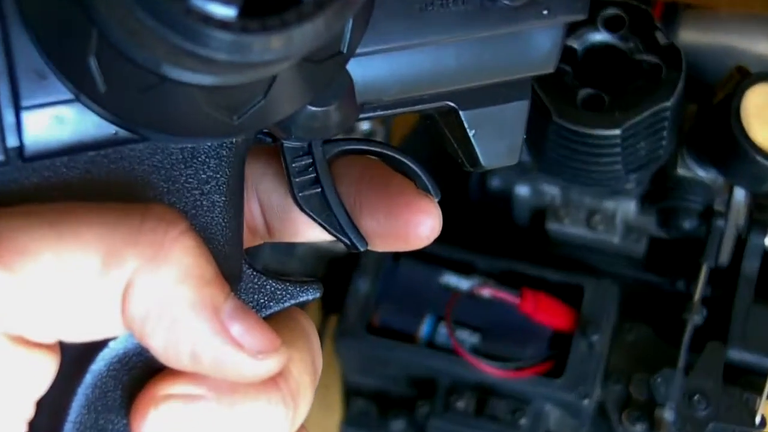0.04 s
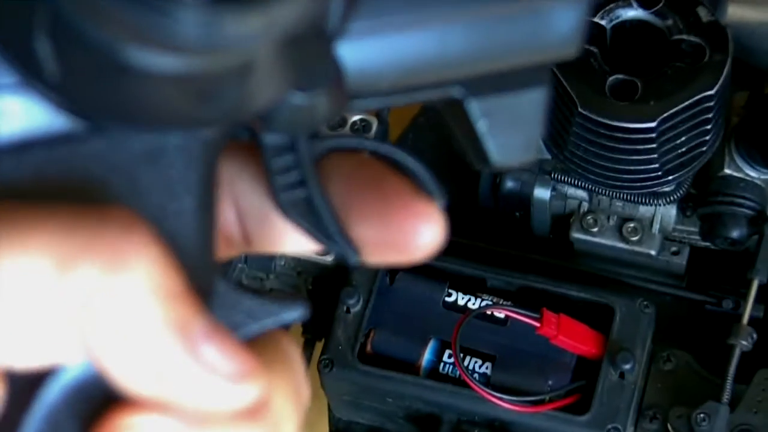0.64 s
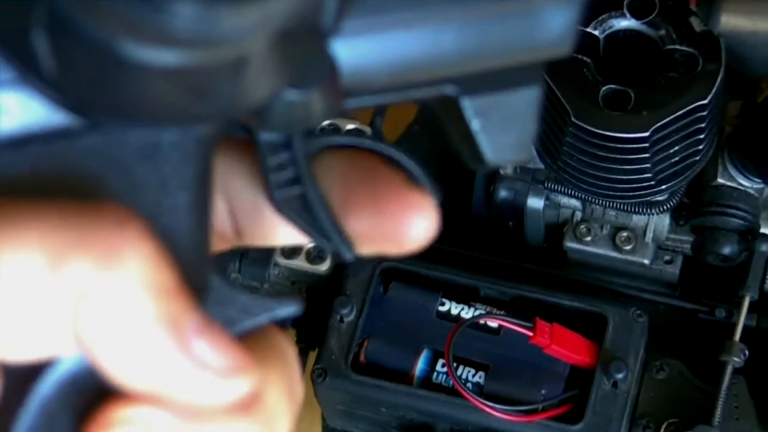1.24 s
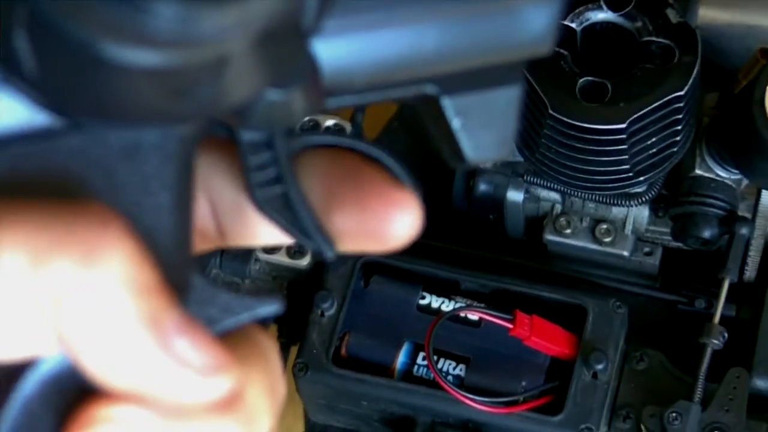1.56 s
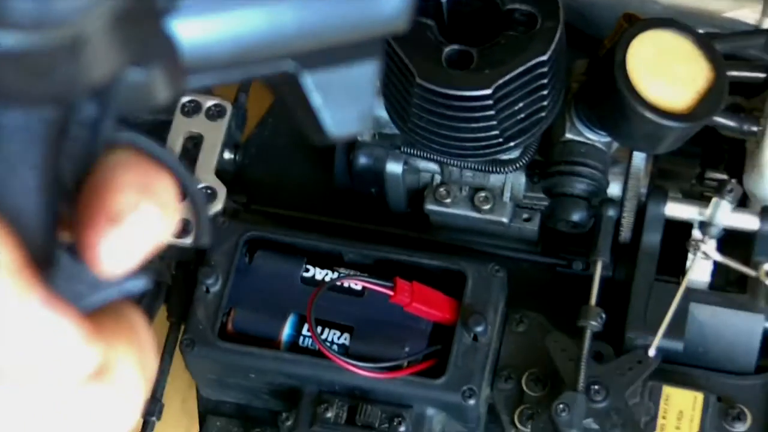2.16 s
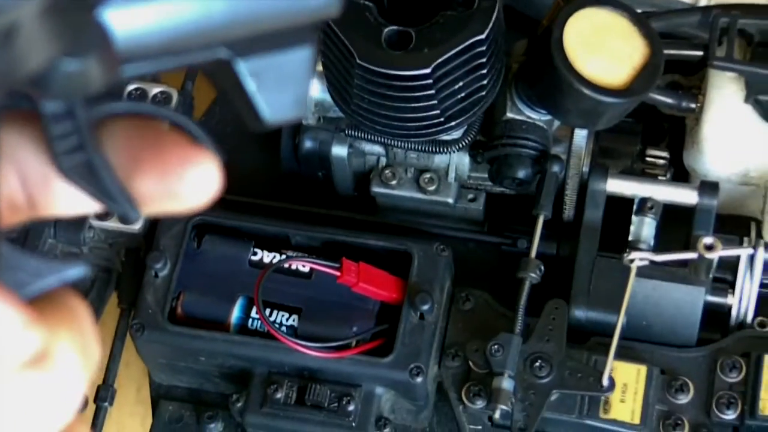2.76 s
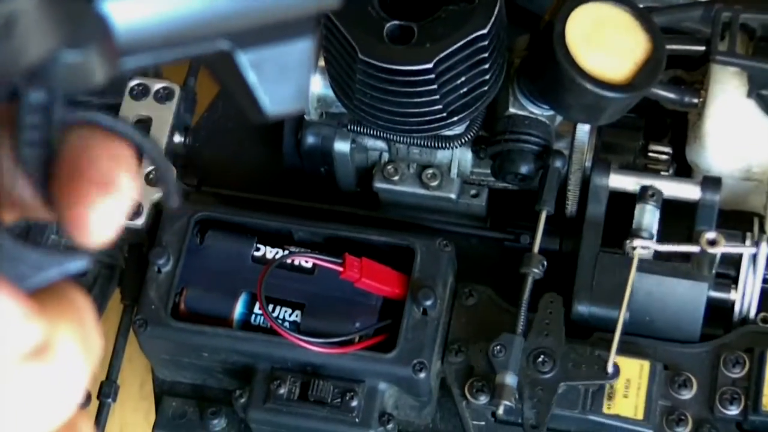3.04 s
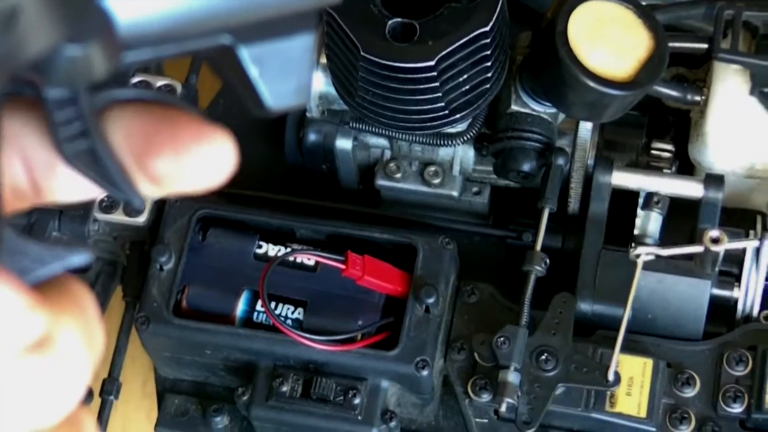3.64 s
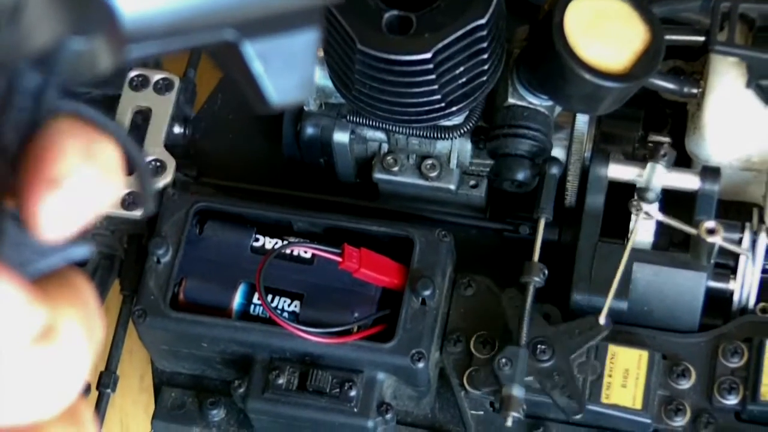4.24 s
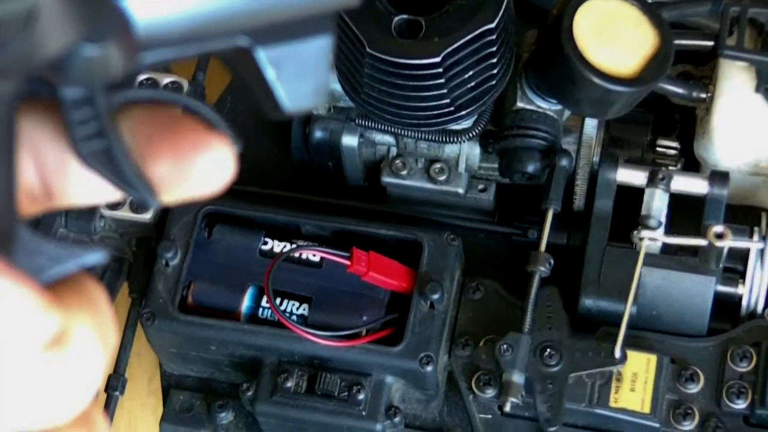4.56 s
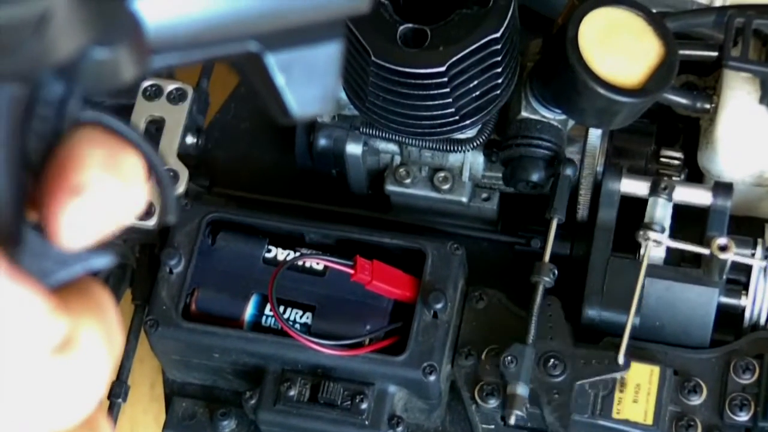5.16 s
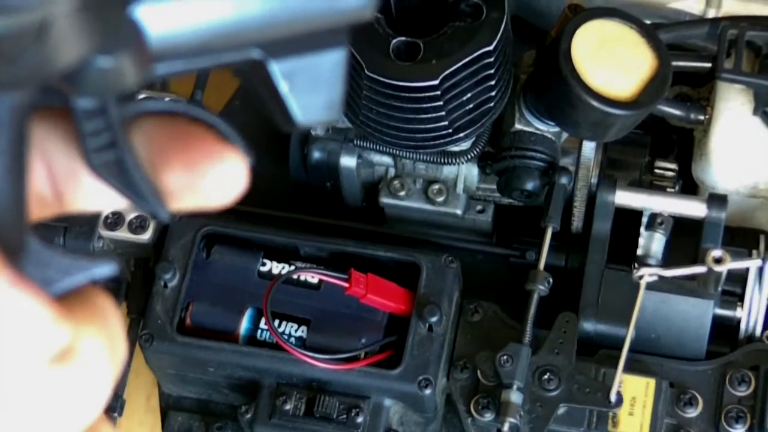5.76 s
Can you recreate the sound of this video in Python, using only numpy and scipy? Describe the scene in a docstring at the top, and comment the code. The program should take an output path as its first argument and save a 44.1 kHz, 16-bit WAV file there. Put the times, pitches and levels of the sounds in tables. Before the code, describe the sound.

Soft lens knocks and one sharp clack, then a model car's servo buzzes in five short pairs, about one pair a second.

```python
"""In a quiet, dry room a camera's focus motor hums now and then, and its lens drive knocks softly,
clacks once and keeps knocking, right at the microphone: each impact rings the modes of the body.
Then a linkage ticks, and a model car's throttle servo swings out and back five times as a finger
pulls and releases the transmitter trigger. Its small motor spins up with a whine, and the impacts of
gear teeth excite the plastic case: a rattle that hisses on briefly as the arm settles."""
import sys
import numpy as np
from scipy import signal
from scipy.fft import rfft, irfft
from scipy.io import wavfile

SR = 44100
rng = np.random.default_rng(int(sys.argv[2]) if len(sys.argv) > 2 else 0)


def waveform_to_disk(signal):
    """Save audio, clipped to [-1, 1], as 16-bit WAV at the path in sys.argv[1]."""
    frames = np.transpose(np.atleast_2d(signal))
    scaled = np.clip(frames, -1, 1) * 32767
    samples = np.round(scaled).astype(np.int16)
    wavfile.write(sys.argv[1], SR, samples)


N = 256068
TIME = np.arange(N) / SR

# The arm swings out against its spring. Each row: motor start and arm arrival in seconds,
# then level, top treble gain and level of the opening rasp in dB.
PULLS = [(0.884, 1.118, -32.5, 5.5, -45.5), (2.01, 2.23, -32.5, 3.5, -36.5),
         (3.094, 3.308, -31.5, 0.5, -36), (4.159, 4.377, -31.5, 0.5, -34), (5.144, 5.367, -32, 1.5, -35)]
# The arm swings back. Each row: motor start and arm arrival in seconds, level and top treble gain in dB.
RETURNS = [(1.212, 1.425, -31.5, 6), (2.341, 2.551, -30.5, 4), (3.436, 3.643, -30.7, 2),
           (4.489, 4.712, -31, 2.5), (5.553, 5.767, -30.5, 4.5)]
SWINGS = [row[:2] for row in PULLS + RETURNS]
BRAKE_LEAD_S, RELEASE_DB_PER_S, RASP_S = 0.022, 465, 0.033


def from_db(db):
    """Amplitude ratio of a level in decibels."""
    return 10 ** (np.asarray(db) / 20)


def rms_one(x):
    """Normalisation to unit rms."""
    return x / np.sqrt(np.mean(x ** 2) + 1e-20)


def band(x, hz, width, order=1):
    """A resonance of gain 1; a higher order has steeper skirts."""
    low = np.sqrt(hz ** 2 + width ** 2 / 4) - width / 2
    edges = [low, min(low + width, SR / 2 - 1)]
    return signal.sosfilt(signal.butter(order, edges, "band", fs=SR, output="sos"), x)


def coloured(x, spectrum):
    """Spectral shaping by a table of frequency in Hz and gain in dB."""
    hz, db = np.transpose(spectrum)
    bins = np.maximum(np.fft.rfftfreq(N, 1 / SR), 1)
    return irfft(rfft(x) * from_db(np.interp(np.log(bins), np.log(hz), db)), N)


def drift(rate):
    """Random modulation of unit rms, with rate new values a second."""
    knots = rng.standard_normal(int(rate * N / SR) + 2)
    return rms_one(np.interp(TIME * rate, np.arange(len(knots)), knots))


def held(start, stop, release_db_per_s, attack_s=0.024):
    """An envelope with a linear rise, a hold until stop and an exponential decay."""
    rise = np.clip((TIME - start) / attack_s, 0, 1)
    return rise * from_db(-release_db_per_s * np.maximum(TIME - stop, 0))


def background(room_db=-62, whistle_hz=6560, whistle_db=-77):
    """Broadband room noise; the focus motor's hum and a faint electronic whistle are narrowband noise."""
    # Room noise and hiss. Each row: frequency in Hz, relative spectral density in dB.
    room_spectrum = [(15, -39), (25, -19.5), (231, -10), (383, -3.5), (558, -0.5), (709, -1), (856, -1),
                     (1150, 1), (1350, -0.5), (2500, -11), (3260, -11), (4750, -14), (6370, -14.5),
                     (13800, -15), (15000, -37)]
    # Runs of the focus motor. Each row: start and end in seconds, level in dB.
    focus_runs = [(0, 0.325, -70), (1.356, 1.627, -63), (1.916, 1.993, -59), (2.38, 2.558, -65),
                  (2.6, 2.702, -61)]
    room = from_db(room_db + 1.1 * drift(19)) * rms_one(coloured(rng.standard_normal(N), room_spectrum))
    focusing = sum(from_db(db) * held(start, stop, release_db_per_s=250) for start, stop, db in focus_runs)
    hum = focusing * rms_one(band(rng.standard_normal(N), hz=347, width=62, order=2))
    whistle = from_db(whistle_db) * rms_one(band(rng.standard_normal(N), whistle_hz, 71))
    return room + hum + whistle


def strike(out, s, level_db, modes, fall_s, chatter_db, chatter_s, rise_s=0.0006):
    """Impact excitation: a contact amid weaker chatter rings each mode, added to out to peak at s."""
    lead, size = SR // 100, SR // 16
    age = (np.arange(size) - lead) / SR
    contact = np.exp(-np.abs(age) / np.where(age < 0, rise_s, fall_s))
    chatter = from_db(chatter_db) * np.exp(-np.abs(age) / chatter_s) * (age > -chatter_s)
    for hz, width, db in modes:
        force = (contact + chatter) * rng.standard_normal(size)
        ring = rms_one(band(force, hz, width, order=2)) * np.sqrt(lead / size)  # level over 10 ms
        swell_s = min(.45 / width, .0025)  # a narrow mode builds up more slowly
        out[int((s - swell_s) * SR) - lead:][:size] += from_db(level_db + db) * ring


def lens_knocks(usual_db=-42, usual_thud_db=-3, thud_loss=0.38):
    """Modal ringing of the camera body under light impacts; the softer the knock, the more it is thud."""
    # Knocks of the lens drive. Each row: time in seconds, strength in dB, hardness (treble gain) in dB.
    knocks = [(.075, -45, -1), (.673, -45, 0), (0.8045, -39.5, 7.5), (0.9223, -44, 1), (1.051, -44.5, 9.5),
              (1.2068, -43, 2.5), (1.2503, -47.5, 9), (1.3964, -41.5, -7), (1.519, -40, 6.5),
              (1.8708, -40, 4.5), (1.97, -47, 3.5), (2.0226, -42.5, 5), (2.1579, -41.5, -3),
              (2.4255, -41.5, -5), (2.491, -40, 5.5), (2.6545, -42, 1.5), (2.8892, -43, 5.5),
              (3.0244, -37.5, 7.5), (3.1405, -43, 3), (3.2374, -45.5, 6), (3.359, -41.5, 0.5),
              (3.4751, -37.5, 8.5), (3.589, -48.5, 5), (3.7713, -46, 3.5), (3.8403, -45, 5),
              (3.956, -44.5, 1.5), (4.008, -47, 5.5), (4.2901, -38, 7), (4.4073, -46, 7.5),
              (4.525, -36.5, 7.5), (4.6243, -44, -18), (4.941, -41, 9), (5.0448, -42.5, -1),
              (5.142, -38, 6.5), (5.2406, -48.5, 11), (5.7376, -46, -15)]
    # Modes of the camera body. Each row: frequency and bandwidth in Hz, relative level in dB.
    body_modes = [(361.4, 126, -8.5), (649, 237, -4), (1019, 114, -6.5), (1268, 191, -5), (1459, 203, -8.5),
                  (1695, 135, -14), (2320, 600, -19.5), (2840, 342, -23), (4900, 2700, -26)]
    out = np.zeros(N)
    for s, db, hard_db in knocks:
        thud_db = usual_thud_db - thud_loss * (db - usual_db)
        modes = []
        for hz, width, mode_db in body_modes:
            tilt_db = np.interp(hz, [700, 1000, 1280, 1460], [thud_db, 0, 0, hard_db])
            modes.append((hz, width, mode_db + tilt_db + rng.normal(0, 1.6)))  # no two strike alike
        strike(out, s, db, modes, fall_s=0.00088, chatter_db=-1, chatter_s=0.0059)
    return out


def lens_clack():
    """A hard impact of the lens and its dull rebound excite heavily damped modes."""
    # Blow and rebound. Each row: time in seconds, strength in dB, gain of the modes above 4 kHz in dB.
    clacks = [(.3753, -20.5, 0), (.4068, -50, -9)]
    # Modes of the clack. Each row: frequency and bandwidth in Hz, relative level in dB.
    clack_modes = [(350, 86, -25.5), (604, 140, -23.5), (840, 259, -9.5), (1157, 240, -1.5),
                   (1910, 650, -11), (2660, 487, -11), (4800, 980, -15.5), (6330, 430, -21),
                   (9150, 2100, -17), (12300, 3800, -27)]
    out = np.zeros(N)
    for s, db, bright_db in clacks:
        modes = [(hz, width, mode_db + bright_db * (hz > 4000)) for hz, width, mode_db in clack_modes]
        strike(out, s, db, modes, fall_s=.0013, chatter_db=-12, chatter_s=.0028)
    return out


def reflections(x, room_db=-25, t60_s=0.88):
    """Reverberation: convolution with a weak, dull, exponentially decaying tail."""
    age = TIME[:SR // 2]
    tail = band(rng.standard_normal(len(age)), hz=1040, width=2100) * from_db(-60 * age / t60_s)
    return from_db(room_db) * signal.fftconvolve(x, tail / np.sqrt(np.sum(tail ** 2)))[:N]


def linkage(fall_s=0.0013, soft_hz=7500, hunt_start_s=3.944, hunt_period_s=.0365, hunt_db=-49.5):
    """Backlash: play is taken up with a tiny scrape that rings the case, the rod and the servo horn."""
    # Ticks of the linkage. Each row: time in seconds, strength of the force in dB.
    ticks = [(0.848, -43.5), (2.255, -29), (2.356, -29.5), (3.07, -38.5), (3.088, -38), (3.344, -30),
             (3.8524, -34.5), (3.89, -49), (4.161, -36), (4.189, -39.5), (4.854, -42), (4.963, -45),
             (5.456, -43), (5.527, -40.5)]
    # At rest the servo hunts for its position in one run of even twitches.
    twitches = [(hunt_start_s + k * hunt_period_s, hunt_db) for k in range(6)]
    force = np.zeros(N)
    for s, db in ticks + twitches:
        start = int(s * SR)
        age = TIME[:min(1000, N - start)]
        force[start:][:len(age)] += from_db(db) * np.exp(-age / fall_s) * rng.standard_normal(len(age))
    force = signal.sosfilt(signal.butter(4, soft_hz, fs=SR, output="sos"), force)
    rod = band(force, hz=5000, width=3600, order=2)
    horn = band(force, hz=1720, width=400)
    return 0.92 * case_ring(force) + rod + 3.6 * horn


def case_ring(force, returning=0.5, wander_db=2):
    """Forced response of the servo case; each tooth flank and arm position excites it differently."""
    # Modes of the case. Each row: frequency and bandwidth in Hz, gain on a pull and on a return in dB.
    case_modes = [(1687, 35, -12.5, -9), (2360, 40, -15, -7), (3075, 160, -3.5, -5.5), (3582, 95, -2, 1.5),
                  (4090, 150, -6, -6.5), (5894, 240, 3, -23), (6210, 71, 5.5, 7.5), (6410, 157, -1.5, 4.5),
                  (6400, 60, -36, -10), (7360, 190, -17, 2), (8400, 320, 1, -3.5), (9290, 440, -4, -4.5),
                  (9880, 430, -13.5, -6)]
    return sum(from_db(pull_db + returning * (back_db - pull_db) + wander_db * drift(24))
               * band(force, hz, width) for hz, width, pull_db, back_db in case_modes)


def swing_load(start, stop, delay_s, growth, brake_db, swell_s=0.016):
    """The rattle grows by a power law once the teeth engage, swells under braking, then decays."""
    engaged = start + delay_s
    rise = np.clip((TIME - engaged) / (stop - engaged), 0, 1) ** growth
    braking = np.exp(-((TIME - stop + BRAKE_LEAD_S) / swell_s) ** 2)
    return rise * from_db(brake_db * braking - RELEASE_DB_PER_S * np.maximum(TIME - stop, 0))


def gear_load(hold_db=-55.5, settle_db=-54, settle_s=0.076, dulling_db_per_s=298, dullest_db=-9):
    """Incoherent parts add in power: gives the gears' level in dB and a power-weighted top treble gain."""
    strokes = [(swing_load(start, stop, delay_s=0.03, growth=0.69, brake_db=1.5), stop, db, top_db)
               for start, stop, db, top_db, _ in PULLS]
    strokes += [(swing_load(start, stop, delay_s=0.00076, growth=0.54, brake_db=2), stop, db, top_db)
                for start, stop, db, top_db in RETURNS]
    rasp = sum(from_db(db) * held(start, start + RASP_S, release_db_per_s=1100) for start, *_, db in PULLS)
    # The gears stir faintly while the arm is held out, and hiss on briefly once it is back.
    holding = sum(held(pull[0] - 0.022, back[0], RELEASE_DB_PER_S) for pull, back in zip(PULLS, RETURNS))
    settling = sum(held(stop, stop + settle_s, release_db_per_s=196) for _, stop, *_ in RETURNS)
    stir = from_db(hold_db) * holding + from_db(settle_db) * settling
    parts = [(rasp, -4), (stir, -6)]  # Each row: amplitude, top treble gain in dB.
    for shape, stop, db, top_db in strokes:
        dulling_db = dulling_db_per_s * np.maximum(TIME - stop + BRAKE_LEAD_S, 0)
        parts.append((from_db(db) * shape, np.maximum(top_db - dulling_db, dullest_db)))
    power = sum(gain ** 2 for gain, _ in parts) + 1e-12
    return 10 * np.log10(power), from_db(sum(gain ** 2 * top_db for gain, top_db in parts) / power)


def rotor_turns(full_hz=252.4, spin_up_s=.06, brake_s=0.056, idle=.2, jitter=.012):
    """Rotation is the integral of speed, which rises exponentially in a swing and falls on arrival."""
    speed = np.full(N, idle)
    for start, stop in SWINGS:
        run_up = 1 - np.exp(-np.maximum(TIME - start, 0) / spin_up_s)
        speed = np.maximum(speed, run_up * np.exp(-np.maximum(TIME - stop, 0) / brake_s))
    return np.cumsum(full_hz * speed * (1 + jitter * drift(150) + jitter * drift(8))) / SR


def tooth_impacts(turns, per_s=10000, size_db=4.5, throb_db=1, catches_per_s=110, catch_db=3):
    """Shot noise of gear teeth, harder once in each turn of the rotor and whenever a tooth catches."""
    hits = (rng.random(N) < per_s / SR) * rng.choice([-1, 1], N)
    sizes = from_db(size_db * np.minimum(rng.exponential(1, N), 4))
    catches = rng.random(N) < catches_per_s / SR
    caught = np.minimum(signal.lfilter([1], [1, -.975], catches + 1e-18), 1)  # fades in about 1 ms
    flutter_db = 1.53 * drift(120)
    modulation_db = throb_db * np.cos(2 * np.pi * turns) + flutter_db + catch_db * caught
    return rms_one(hits * sizes * from_db(modulation_db))


def servo(light_load_db=-47, graze_ring_db=4, rasp_db=-1, top_hz=10800):
    """Source and filter: tooth impacts rattle and ring the case, following the load, over horn and motor."""
    # Colour of the gear rattle. Each row: frequency in Hz, gain in dB.
    gear_spectrum = [(250, -28.5), (550, -22.5), (1100, -22), (1600, -9), (2100, -14.5), (2700, -13),
                     (4200, -6), (5500, -2), (7400, -1.5), (7900, -5.5), (8300, -1.5), (10500, -22.5),
                     (13000, -18), (15000, -107.5)]
    level_db, top_gain = gear_load()
    returning = sum((TIME > start - .03) & (TIME < stop + .2) for start, stop, *_ in RETURNS)
    turns = rotor_turns()
    rattle = coloured(tooth_impacts(turns), gear_spectrum)
    gears = rms_one(rattle + case_ring(tooth_impacts(turns), returning))
    # Under light load the teeth only graze, and the main case resonance stands out.
    grazing = 1 / (1 + from_db(2 * (level_db - light_load_db)))
    gears = (gears + grazing * from_db(graze_ring_db) * band(gears, 6040, 340)) / (1 + 0.7 * grazing)
    # Each pull opens with a thin rasp as the gears take up the return spring.
    straining = sum((TIME > start) & (TIME < start + RASP_S) for start, *_ in PULLS)
    rasp = from_db(rasp_db) * (band(gears, 6700, 630) + 2 * band(gears, 10150, 530))
    gears += straining * (rasp - 0.6 * gears)
    # Harder contact adds top treble.
    top = signal.sosfiltfilt(signal.butter(4, top_hz, "high", fs=SR, output="sos"), gears)
    gears += top * (top_gain - 1)
    return from_db(level_db) * gears + horn_ring(level_db) + motor_whine(turns, returning)


def horn_ring(level_db, hz=1690, width_hz=110, horn_db=-55, follow=0.34, reference_db=-35):
    """Resonance of the servo horn and rod, which grows only slowly with the load on the gears."""
    ring = rms_one(band(rng.standard_normal(N), hz, width_hz))
    return from_db(horn_db + follow * (level_db - reference_db)) * ring


def motor_whine(turns, returning, whine_db=-68.5, return_db=7):
    """Harmonics of the rotation rate sound while the motor is driven, clearer on the freer return."""
    # Partials of the whine. Each row: multiple of the rotor speed, relative level in dB.
    harmonics = [(3, 0), (4, -2), (6, -5), (7, -2), (8, -7), (10, -3)]
    driven = sum(np.interp(TIME, [start, start + .06, stop - .02, stop + .01], [0, 1, 1, 0])
                 for start, stop in SWINGS)
    tone = sum(from_db(db + 2 * drift(36)) * np.sin(2 * np.pi * k * turns) for k, db in harmonics)
    return driven * tone * from_db(whine_db + return_db * returning + 1.5 * drift(4))


def scene(low_cut_hz=260):
    """Superposition: servo, ticks and knocks get faint reverberation; the clack stays dry and short."""
    near = servo() + linkage() + lens_knocks()
    # A low cut, like a microphone's, thins the bass of all four.
    low_cut = signal.butter(4, low_cut_hz, "high", fs=SR, output="sos")
    parts = signal.sosfilt(low_cut, near + reflections(near) + lens_clack())
    return (parts + background())[None]


def record(dry):
    """Frequency response of the microphone: one narrow treble notch and a steep cut at the top."""
    notched = dry - band(dry, hz=8050, width=91)
    return signal.sosfilt(signal.ellip(10, .2, 80, 14800, fs=SR, output="sos"), notched)


dry = scene()
out = record(dry)
waveform_to_disk(out)
```